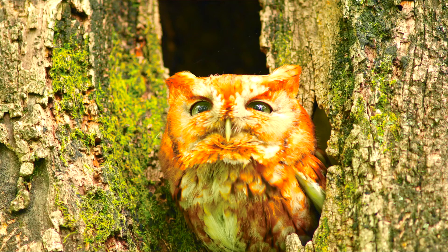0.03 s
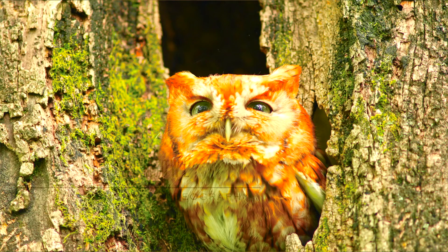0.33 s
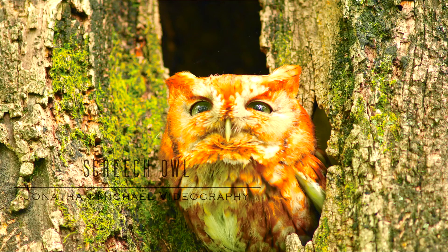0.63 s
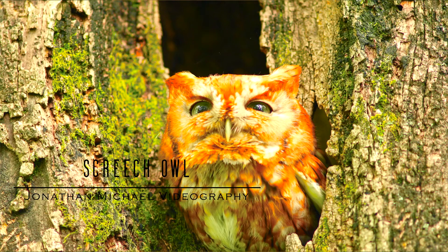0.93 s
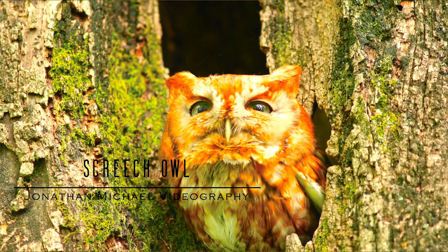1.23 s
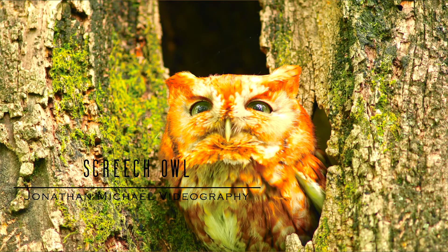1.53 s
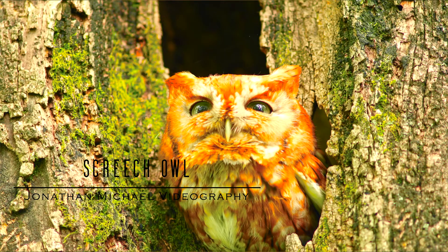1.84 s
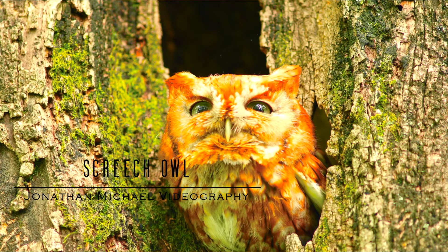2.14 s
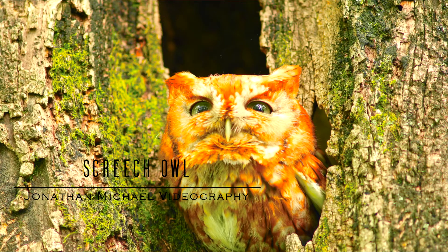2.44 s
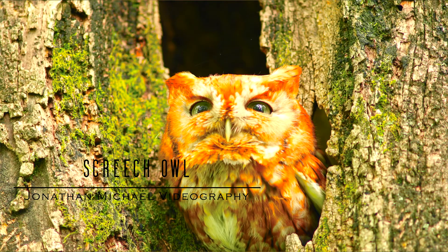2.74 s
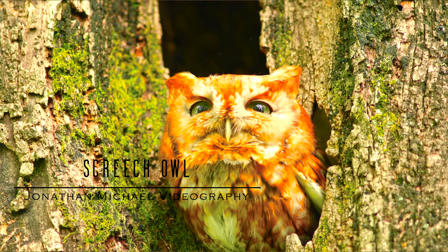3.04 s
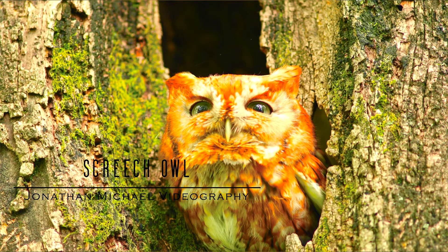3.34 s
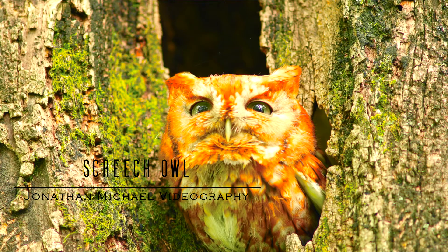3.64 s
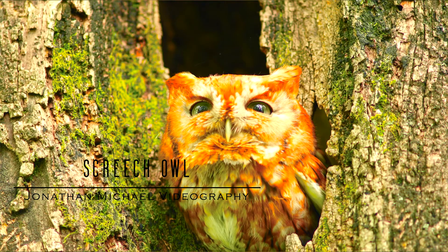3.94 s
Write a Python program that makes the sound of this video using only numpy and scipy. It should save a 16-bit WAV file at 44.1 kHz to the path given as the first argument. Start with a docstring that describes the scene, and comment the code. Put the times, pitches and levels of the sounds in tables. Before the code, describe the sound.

A small bird's harsh nasal scolding is the loudest sound, about nine quick notes from 2.9 to 3.7 seconds. Before it, faint birds warble far away, a soft whistle slides down near 1.9 seconds, and a buzzy falling note at 2.3 runs into a fading trill. Two soft peeps close. The calls echo through the wood over steady hiss, low rumble, a distant engine drone and very faint insect buzzes.

```python
"""First come faint, warbling birds far off in a wood, over steady hiss and a distant engine's drone.
One bird slides a whistle downward, then a songbird gives a buzzy falling note that runs into a fading
trill. Loudest of all, a small bird scolds in a row of harsh nasal notes, made of stacked tones and
raspy noise. Two soft peeps follow. Every call echoes off the trees, and an insect buzzes thinly."""
import sys
import numpy as np
from scipy import signal
from scipy.fft import rfft, irfft
from scipy.io import wavfile
from scipy.ndimage import uniform_filter1d

SR = 44100
rng = np.random.default_rng(int(sys.argv[2]) if len(sys.argv) > 2 else 0)


def pcm_store(signal):
    """Save signal as 16-bit PCM."""
    levels = np.round(np.clip(np.atleast_2d(signal), -1, 1) * 32767)
    wavfile.write(sys.argv[1], SR, levels.astype(np.int16).T)


N = 176400

# Scolding notes; the pitch is the peak of the strongest tone, and roughness runs from 0 to 1.
# start_s, length_s, level_db, pitch_hz, roughness, treble_db
SCOLD_NOTES = [(2.859, 0.042, -48.5, 4190, 0.64, -19), (2.932, 0.03, -49, 4180, 0.7, -21),
               (2.989, 0.049, -42, 4130, 0.94, -29), (3.07, 0.054, -42, 4250, .8, -7.5),
               (3.147, 0.064, -33, 4160, 0.52, -23), (3.238, .077, -29.5, 4226, 0.16, -29),
               (3.347, 0.082, -29.5, 4200, 0.17, -35), (3.473, .076, -28.5, 4230, 0.08, -33),
               (3.6, 0.076, -36, 4150, 0.76, -23)]
# The tones stacked in the bird's voice: multiple_of_pulse_rate, relative_db
SCOLD_TONES = [(5, -27.5), (6, -26), (9, -28.5), (10, -14), (11, -11), (12, -1), (13, -9), (14, -23),
               (15, -19.5), (16, -31.5)]
# Three noises in a note (its rasp, its high hiss, its sharp opening): frequency_hz, relative_db
RASP_SPECTRUM = [(1400, -34), (2000, -25), (2700, -17), (3300, -5.5), (4200, -4.5), (4800, -6),
                 (5400, -10.5), (5900, -19), (7000, -30)]
TREBLE_SPECTRUM = [(5500, -28), (6500, -10), (7500, 2), (8300, -6), (9200, -1), (10200, -20), (12000, -30)]
OPENING_SPECTRUM = [(4500, -16), (5000, 2), (5300, -2), (5700, -21), (6200, -25)]

def scolding_bird():
    """Each note opens as a rasp, swells, arches in pitch and partly clears into a nasal stack of tones."""
    t, out = clock(), np.zeros(N)
    strongest, release_s, opening_s = 12, 0.02, 0.027
    rasp, treble, sharp = noise(RASP_SPECTRUM), noise(TREBLE_SPECTRUM), noise(OPENING_SPECTRUM)
    jitter = 1 + 0.0075 * wander(700) + 0.0062 * wander(70)
    flutter = 1 + 0.28 * wander(600)
    stack_rms = np.sqrt(sum(from_db(db) ** 2 for _, db in SCOLD_TONES) / 2)
    stack = []
    for multiple, db in SCOLD_TONES:
        weaker = multiple != strongest  # only the weaker tones flicker and smear
        gain = from_db(db + weaker * 3.5 * wander(120)) / stack_rms
        stack.append((multiple, gain, weaker * 0.75 * wander(180)))
    for start_s, length_s, level_db, pitch_hz, roughness, treble_db in SCOLD_NOTES:
        on = (t > start_s) & (t < start_s + length_s + release_s)
        age = t[on] - start_s
        progress = age / length_s
        swell = np.minimum(progress / 0.55, 1)
        fades = np.clip(age / 0.0041, 0, 1) * np.clip(1 - (age - length_s) / release_s, 0, 1) ** 2
        arch = 1 - 0.13 * (1 - progress / 0.9) ** 2
        phase = phase_of(pitch_hz / strongest * arch * jitter[on])
        voice = flutter[on] * sum(gain[on] * np.sin(multiple * phase + smear[on] + random_phase())
                                  for multiple, gain, smear in stack)
        rasp_share = np.clip(roughness + 0.74 * (1 - swell ** 2), 0, 1)
        hiss = from_db(0.5) * rasp_share * rasp[on] + from_db(treble_db) * treble[on]
        hiss *= 1 + 0.18 * np.cos(phase)  # the noise pulses with the voice
        opening = from_db(level_db - 16) * np.exp(-(2 * age / opening_s - 1) ** 2) * sharp[on]
        body = from_db(level_db - 14.5 * (1 - swell)) * (np.sqrt(1 - rasp_share ** 2) * voice + hiss)
        out[on] += fades * (opening + body)
    return out + tree_echoes(out, -7.5, decay_s=0.42)


# The path of the songbird's falling note: time_s, pitch_hz, level_db
BUZZ_PATH = [(2.3, 5600, -57), (2.326, 5350, -50), (2.338, 4850, -41), (2.358, 4540, -31.5),
             (2.372, 4380, -31.5), (2.39, 4100, -37), (2.403, 3680, -35), (2.409, 3500, -44)]
# Trill beats, each a downward flick and then a lower pip: start_s, flick_db, pip_db
TRILL_BEATS = [(2.39, -44, -49), (2.452, -40.5, -52), (2.514, -39.5, -47), (2.577, -39.5, -49),
               (2.641, -41.5, -52), (2.703, -43, -51), (2.762, -47.5, -51), (2.8, -51, -62)]

def songbird():
    """A falling whistle chopped into a buzz, then a ragged trill of flicks and pips."""
    t = clock()
    chop_hz, chop_end_s = 170, 2.385
    pitch_hz, gain = follow(BUZZ_PATH)
    depth = 0.95 * np.clip((chop_end_s - t) / 0.0076, 0, 1)
    chop = 1 + depth * np.cos(2 * np.pi * chop_hz * t)
    buzz = gain * chop * np.sin(phase_of(pitch_hz * (1 + 0.015 * wander(600))))
    trill, warble = np.zeros(N), 0.028 * wander(700)
    for start_s, flick_db, pip_db in TRILL_BEATS:
        trill += chirp(start_s, 0.0237, from_hz=4143, to_hz=3230, level_db=flick_db, bend=warble)
        trill += chirp(start_s + 0.0344, 0.0226, from_hz=2950, to_hz=2600, level_db=pip_db, bend=warble)
    return buzz + trill + tree_echoes(buzz, -0.5) + tree_echoes(trill, 1)


# The path of the sliding whistle: time_s, pitch_hz, level_db
WHISTLE_PATH = [(1.875, 3310, -57), (1.9, 3240, -45.5), (1.908, 2700, -49), (1.94, 2250, -57),
                (1.965, 2135, -52), (2.04, 2090, -51.5), (2.11, 2055, -49.5), (2.17, 2015, -60),
                (2.21, 1980, -67)]

def whistling_bird():
    """One fluttering whistle that drops steeply and levels off."""
    pitch_hz, gain = follow(WHISTLE_PATH)
    flutter = from_db(3.5 * wander(90))
    out = gain * flutter * np.sin(phase_of(pitch_hz * (1 + 0.0081 * wander(400))))
    return out + tree_echoes(out, -2)


# Calls from far away: start_s, length_s, from_hz, to_hz, level_db, warble_share
FAR_CHIRPS = [(0.105, 0.053, 4560, 4350, -53.5, 0.043), (0.147, .16, 2900, 2300, -52, 0.14),
              (0.219, .14, 2300, 3100, -52.5, 0.18), (0.443, .16, 2284, 3035, -55.5, .1),
              (0.949, 0.14, 4400, 4750, -54.5, .04), (1.078, .16, 4690, 4760, -62, 0.016),
              (1.218, .13, 4400, 3680, -58, 0.016), (1.239, 0.19, 1644, 2150, -57.5, 0.018),
              (1.415, .11, 2210, 2020, -51.5, 0.0267), (1.38, .28, 3700, 4350, -57, 0.0121),
              (1.462, .04, 3430, 3140, -55, .005), (1.52, 0.17, 2136, 2150, -61, 0.027),
              (1.62, 0.17, 4520, 4400, -59, 0.028), (1.724, 0.036, 3550, 3570, -55, 0.0038),
              (2.09, .08, 4260, 4220, -61, 0.0063), (2.802, 0.31, 2123, 2280, -53, 0.098)]

def far_birds():
    """Warbled chirps, heard mostly as their echoes."""
    warble = wander(259)
    out = sum(chirp(*note, bend=share * warble) for *note, share in FAR_CHIRPS)
    return from_db(-3.5) * out + tree_echoes(out, -1)


# Soft peeps near the end: start_s, length_s, top_pitch_hz, level_db
PEEP_NOTES = [(3.726, .08, 2426, -55.5), (3.896, 0.053, 2420, -51.5)]

def peeping_bird():
    """Soft whistled notes that rise and round off."""
    out, warble = np.zeros(N), 0.015 * wander(400)
    for start_s, length_s, top_hz, level_db in PEEP_NOTES:
        progress = np.clip((clock() - start_s) / length_s, 0, 1)
        arch = -0.29 * (1 - progress / 0.67) ** 2
        out += chirp(start_s, length_s, top_hz, top_hz, level_db, bend=warble + arch)
    return out + tree_echoes(out, -2)


# The insect's buzzes: start_s, level_db
INSECT_BUZZES = [(.09, -68), (.69, -66), (1.41, -66), (2.02, -65), (2.62, -66), (3.33, -68)]

def insect(pitch_hz=11300, length_s=0.097):
    """Short, very high tones that a fast pitch wobble turns into thin buzzes."""
    wobble = 0.0038 * wander(600)
    return sum(chirp(start_s, length_s, pitch_hz, pitch_hz, db, wobble) for start_s, db in INSECT_BUZZES)


# How the engine runs: time_s, firing_rate_hz, level_db
ENGINE_PATH = [(.12, 109.5, -38), (.8, 110, -39), (1.3, 111.5, -39), (2.0, 111.5, -39), (2.58, 111.5, -41),
               (2.68, 111.5, -52), (3.55, 112, -49), (3.72, 113, -44), (4, 111, -46.5)]
# The tones in its drone: multiple_of_firing_rate, relative_db
ENGINE_TONES = [(.5, -11), (.8, -11), (1, -0.5), (1.4, -10.5), (3.18, -23.5)]

def distant_engine():
    """Low, wavering tones that follow how fast the engine fires."""
    firing_hz, gain = follow(ENGINE_PATH)
    phase = phase_of(firing_hz * (1 + 0.0032 * wander(8.6)))
    drone = sum(from_db(db + wander(7.56)) * np.sin(multiple * phase + random_phase())
                for multiple, db in ENGINE_TONES)
    return np.sqrt(2) * gain * drone


# The wood's low rumble and its airy hiss: frequency_hz, relative_db
RUMBLE_SPECTRUM = [(16, -23), (30, -13), (44, 2.5), (62, 0.5), (80, -3.5), (125, -5.5), (170, -9.5),
                   (230, -13), (320, -30.5), (600, -41)]
AIR_SPECTRUM = [(150, -9.5), (320, 1.5), (560, 2), (800, -2.5), (1050, -5), (1400, -8.5), (2600, -11.5),
                (4800, -12), (6100, -20), (7600, -20.5), (9300, -18.5), (11000, -22), (15700, -23)]
# How loud the rumble is: time_s, level_db
RUMBLE_LEVELS = [(.12, -36.5), (1.0, -41.5), (2.7, -40.5), (3.2, -40.5), (4, -40.5)]

def woodland_air():
    """A low rumble and a smooth hiss of air."""
    rumble_db = np.interp(clock(), *np.array(RUMBLE_LEVELS).T)
    rumble = from_db(rumble_db + 0.5 * wander(3.67)) * noise(RUMBLE_SPECTRUM)
    hiss = from_db(-46.5 + 0.083 * wander(4.05)) * noise(AIR_SPECTRUM)
    return rumble + hiss


def tree_echoes(sound, level_db, decay_s=0.69, delay_s=0.01):
    """Scattered echoes from trunks and leaves, fading by 60 dB in decay_s."""
    t = clock()[:SR]
    tail = rng.standard_normal(SR) * np.exp(-np.log(1000) * t / decay_s) * (t > delay_s)
    return from_db(level_db) * signal.fftconvolve(sound, tail / np.sqrt(np.sum(tail ** 2)))[:N]


def chirp(start_s, length_s, from_hz, to_hz, level_db, bend):
    """A gliding whistle that fades in and out; bend shifts its pitch by a fraction."""
    progress = np.clip((clock() - start_s) / length_s, 0, 1)
    pitch_hz = (from_hz + (to_hz - from_hz) * progress) * (1 + bend)
    return from_db(level_db) * np.sqrt(2) * np.sin(np.pi * progress) * np.sin(phase_of(pitch_hz))


def follow(path):
    """Pitch and gain along a path of points; silent before and after it."""
    time_s, pitch_hz, level_db = np.array(path).T
    t = clock()
    gate = uniform_filter1d(1.0 * ((t > time_s[0]) & (t < time_s[-1])), size=128)
    return np.interp(t, time_s, pitch_hz), from_db(np.interp(t, time_s, level_db)) * gate


def noise(spectrum):
    """Noise of strength 1, with its lows and highs shaped by a spectrum table."""
    hz, db = np.array(spectrum).T
    bins_hz = np.maximum(np.arange(N // 2 + 1) * SR / N, 1)
    gain = from_db(np.interp(np.log(bins_hz), np.log(hz), db))
    roll_off = np.minimum(bins_hz / hz[0], 1) ** 2 * np.minimum(hz[-1] / bins_hz, 1) ** 2
    return unit_rms(irfft(rfft(rng.standard_normal(N)) * gain * roll_off, N))


def wander(rate_hz):
    """A smooth random curve of strength 1 that turns rate_hz times a second."""
    hold = max(int(SR / rate_hz), 2)
    steps = np.repeat(rng.standard_normal(N // hold + 2), hold)
    return unit_rms(uniform_filter1d(steps, hold)[rng.integers(hold):][:N])


def phase_of(pitch_hz):
    return 2 * np.pi * np.cumsum(pitch_hz) / SR


def random_phase():
    return rng.uniform(0, 2 * np.pi)


def from_db(db):
    return 10 ** (np.asarray(db) / 20)


def unit_rms(x):
    return x / np.sqrt(np.mean(x ** 2))


def clock():
    return np.arange(N) / SR


def scene():
    """All the sources added into one channel."""
    birds = scolding_bird() + songbird() + whistling_bird() + far_birds() + peeping_bird()
    return (birds + insect() + distant_engine() + woodland_air())[None]


def record(dry):
    """The sound cuts in after a moment of silence, with the very highest treble removed."""
    silence_s, top_hz = 0.1151, 15720
    fade_in = np.clip((clock() - silence_s) / 0.007, 0, 1)
    low_pass = signal.ellip(10, 0.1, 80, top_hz, fs=SR, output="sos")
    return signal.sosfilt(low_pass, dry * fade_in)


dry = scene()
out = record(dry)
pcm_store(out)
```